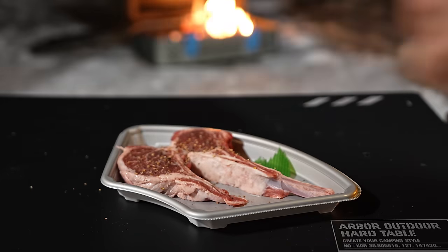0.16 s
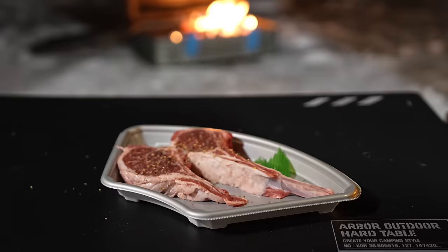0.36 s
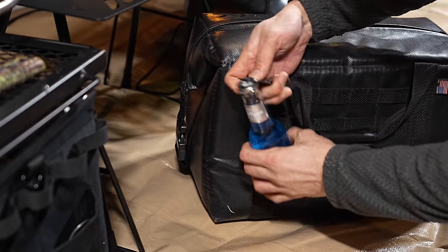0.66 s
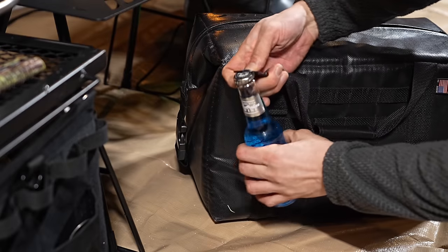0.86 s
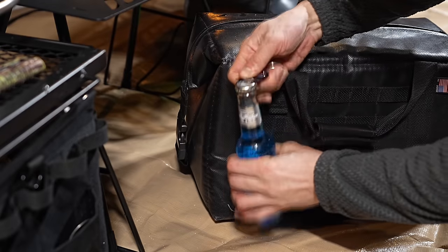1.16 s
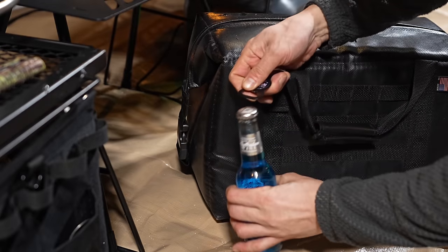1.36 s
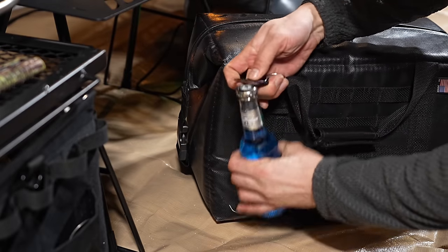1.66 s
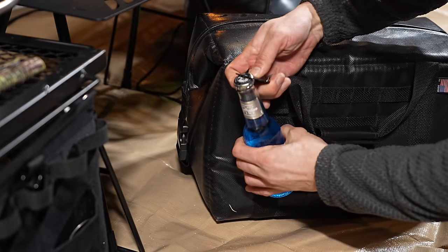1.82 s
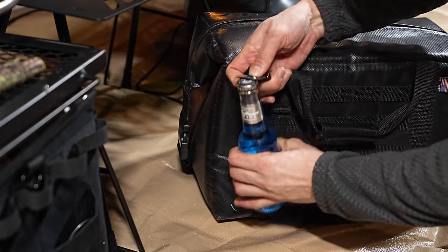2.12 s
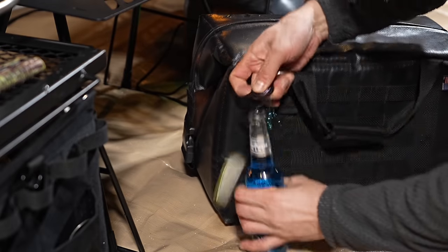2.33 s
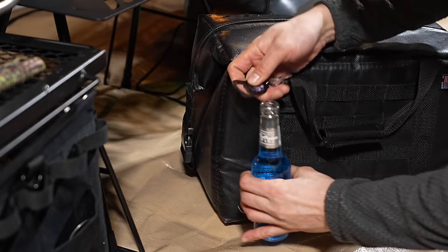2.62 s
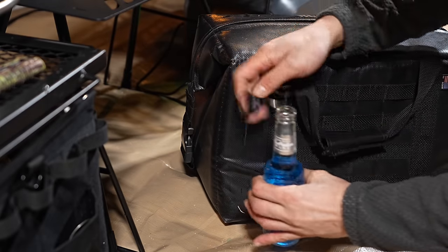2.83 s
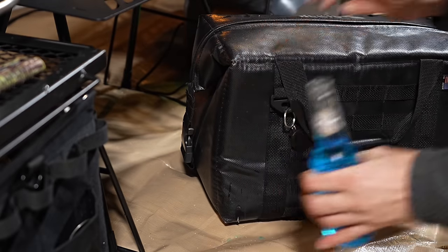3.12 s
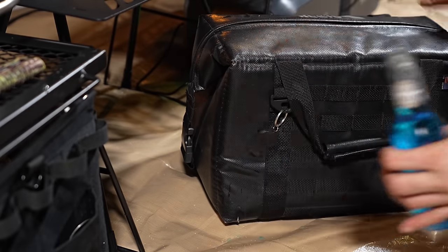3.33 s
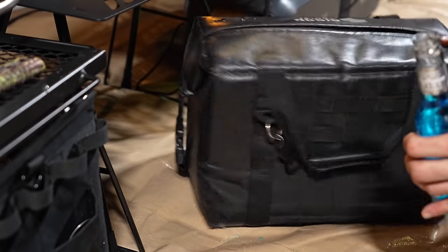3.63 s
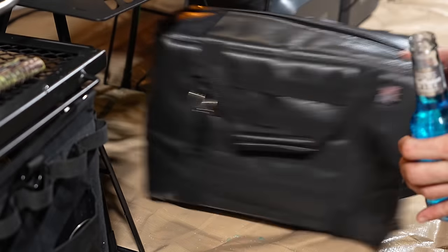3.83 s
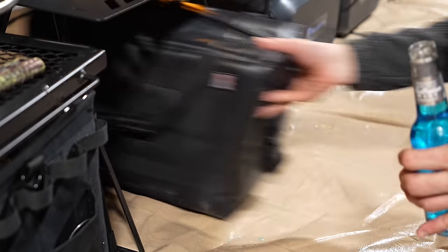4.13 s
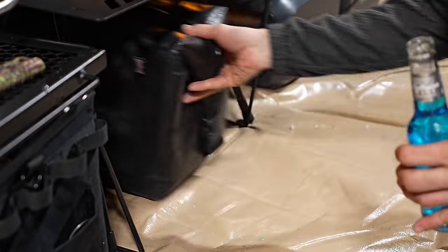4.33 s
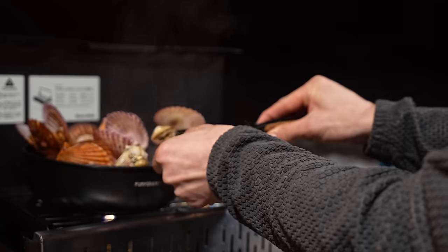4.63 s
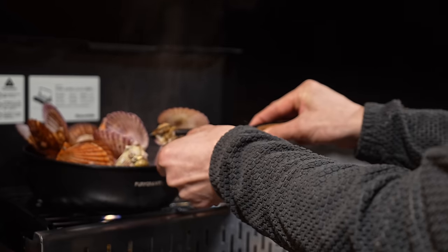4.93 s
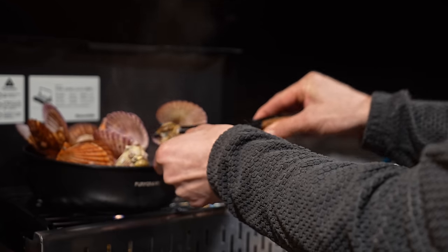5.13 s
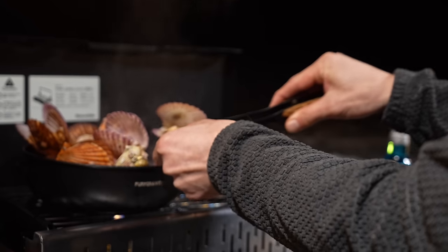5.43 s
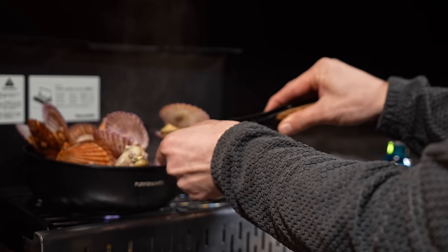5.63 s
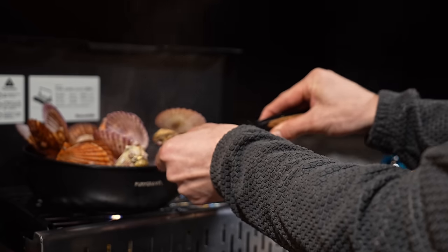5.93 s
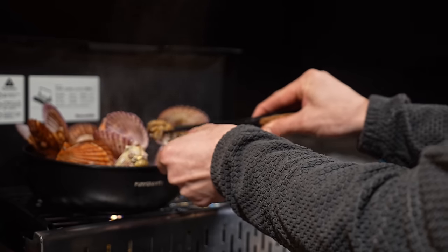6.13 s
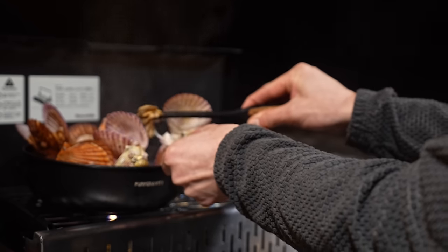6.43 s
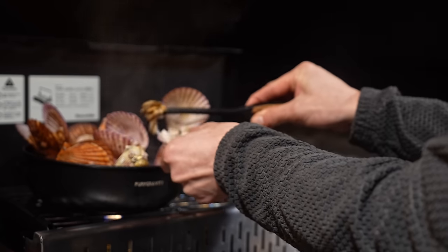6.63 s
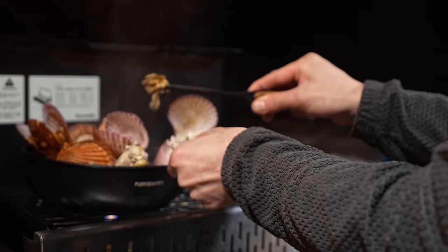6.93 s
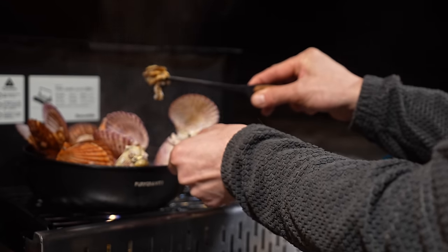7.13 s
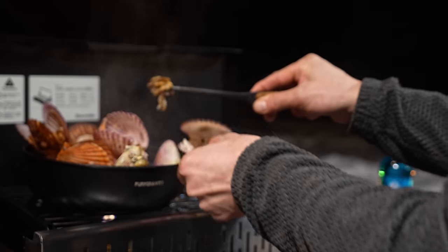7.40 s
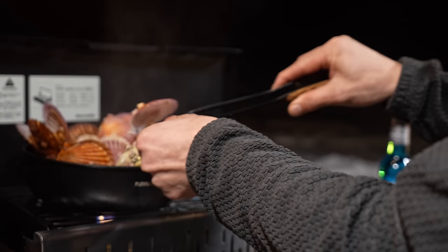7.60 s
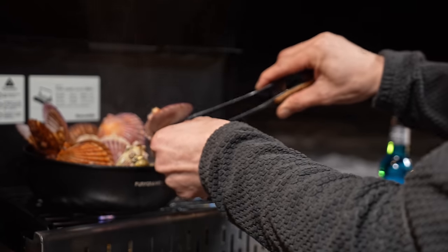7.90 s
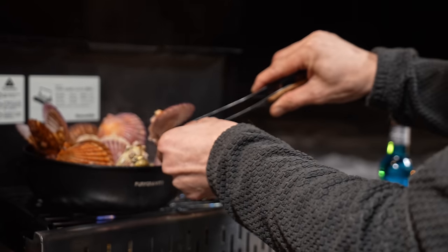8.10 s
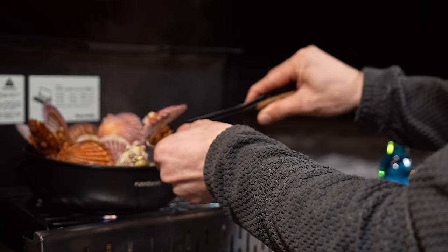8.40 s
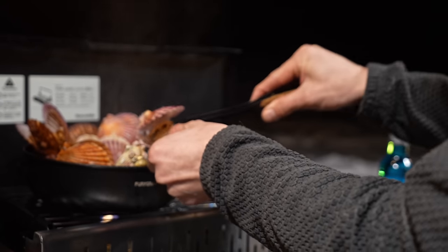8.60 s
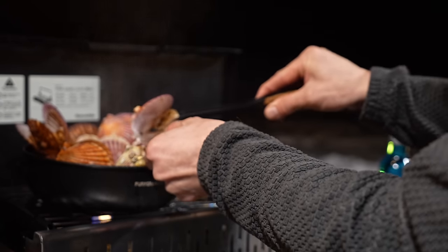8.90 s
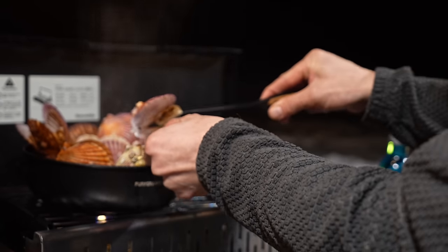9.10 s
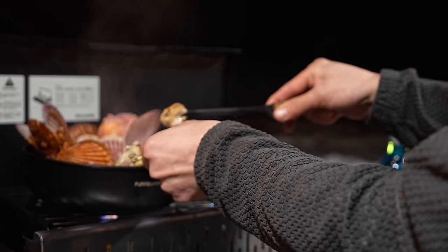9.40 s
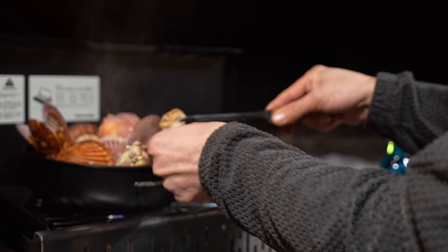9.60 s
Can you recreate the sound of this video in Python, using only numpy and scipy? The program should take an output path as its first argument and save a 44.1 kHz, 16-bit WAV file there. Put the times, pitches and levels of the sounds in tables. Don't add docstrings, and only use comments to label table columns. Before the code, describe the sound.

In a small tent porch with a short, sharp echo, a low flame roars throughout. First a light tray scrapes with a thin, high squeak. Then come metallic opener knocks, fizzing gas, a glassy cap pop and dull bounces, followed by a bottle set down and a heavy bag dragged over tarp. Finally dry, bright clicks of tongs on shells end with a firm pan knock, captured close in mono.

```python
import sys
import numpy as np
from scipy import signal
from scipy.io import wavfile
from scipy.ndimage import uniform_filter1d

SR = 44100
rng = np.random.default_rng(int(sys.argv[2]) if len(sys.argv) > 2 else 0)


def wav_record(signal):
    frames = np.transpose(np.atleast_2d(signal))
    bounded = np.clip(frames, -1, 1)
    quanta = np.round(bounded * 32767).astype(np.int16)
    wavfile.write(sys.argv[1], SR, quanta)


def voltage_ratio(decibels):
    exponent = np.asarray(decibels, float) / 20
    return 10 ** exponent


N = 429971


def rms_one(x):
    return x / np.sqrt(np.mean(x ** 2) + 1e-20)


def in_time(rows, silent=-120):
    s, *columns = np.transpose(rows)
    return [np.interp(np.arange(N) / SR, s, c, silent, silent) for c in columns]


def band(x, low_hz, high_hz):
    sos = signal.butter(2, [low_hz, min(high_hz, .45 * SR)], "band", fs=SR, output="sos")
    return signal.sosfilt(sos, x)


def drift(rate):
    r = np.exp(-80 * np.pi * rate / SR)
    slow = signal.lfilter([1], [1, -2 * r, r * r], rng.standard_normal(N // 40 + 2002))[2000:]
    return np.interp(np.arange(N) / 40, np.arange(len(slow)), rms_one(slow))


def ring(clicks, hz, t60):
    r, w = voltage_ratio(-60 / (t60 * SR)), 2 * np.pi * hz / SR
    return signal.lfilter([0, np.sin(w)], [1, -2 * r * np.cos(w), r * r], clicks + 1e-18)


def damped(hz, t60):
    t = np.arange(round(t60 * SR)) / SR
    return np.sin(2 * np.pi * hz * t) * voltage_ratio(-60 * t / t60)


def add(out, i, sound):
    out[i:i + len(sound)] += sound[:N - i]


def blows(hits, colour_db, own_db, modes=(), ring_db=-10, own_cycles=28, split=0.05, luck_db=1.5, spike=1.3):
    # (low edge [Hz], high edge [Hz], T60 [s])
    crack_bands = [(277, 3800, 0.017), (2580, 8770, 0.0069), (6500, 16300, 0.0083)]
    rows, out = np.array(hits), np.zeros(N)
    at = np.round(rows[:, 0] * SR).astype(int)
    first = at[0]
    size = min(at[-1] + SR // 3, N) - first
    luck = rng.normal(0, luck_db, (len(at), len(modes)))
    for k, (low_hz, high_hz, t60) in enumerate(crack_bands):
        level_db = rows[:, 1] + colour_db[k] + (k - 1) * rows[:, 3]
        clicks = np.zeros(size)
        clicks[at - first] = voltage_ratio(level_db)
        rough = rng.standard_normal(size)
        rough[at - first] = spike
        dying = signal.lfilter([1], [1, -voltage_ratio(-60 / (t60 * SR))], clicks + 1e-18)
        equal_power = np.sqrt(SR / 2 / (high_hz - low_hz))
        out[first:first + size] += band(dying * rough, low_hz, high_hz) * equal_power
        for m, (hz, mode_db, ring_s) in enumerate(modes):
            if low_hz <= hz < high_hz:
                clicks[at - first] = voltage_ratio(level_db + mode_db + ring_db + luck[:, m])
                out[first:first + size] += ring(clicks, hz, ring_s)
    for i, (s, peak_db, hz, *_), detune in zip(at, hits, rng.uniform(-split, split, len(at))):
        t60 = own_cycles / hz
        pair = damped(hz, t60) + 0.5 * damped(hz * (1 + detune), t60)
        add(out, i, voltage_ratio(peak_db + own_db) * pair)
    return out


def strokes(rows, colour_db):
    fade_db = 25
    lean = np.linspace(-1, 1, len(colour_db))
    t = np.arange(0, N, 16) / SR
    out = 0
    for s, db, rise, fall, bright_db in rows:
        shape_db = -fade_db * np.maximum((s - t) / max(rise, .002), (t - s) / max(fall, .002))
        band_gain = voltage_ratio(db + np.array(colour_db) + bright_db * lean)
        out = out + np.outer(band_gain, voltage_ratio(np.maximum(shape_db, -200)))
    return np.repeat(out, 16, axis=1)[:, :N]


def rubbing(gains, edges_hz, per_s, spread_db, modes=(), ring_share=0, patchy_db=4.5, grip_db=4.5, damping=0.14):
    happens = rng.random(N) < per_s / SR
    height = voltage_ratio(spread_db * np.minimum(rng.exponential(1, N), 5))
    slips = rms_one(happens * height * rng.standard_normal(N))
    if modes:
        rings = 0
        for hz, db, t60 in modes:
            grip = voltage_ratio(db / 2 + grip_db * drift(6.9))
            rings = rings + grip * rms_one(ring(slips, hz, damping * t60))
        slips = slips + ring_share * rms_one(rings)
    gains = uniform_filter1d(gains, size=300)
    out = 0
    for k, (low, high) in enumerate(zip(edges_hz, edges_hz[1:])):
        sign = (-1) ** k
        out = out + sign * gains[k] * voltage_ratio(patchy_db * drift(21.0)) * rms_one(band(slips, low, high))
    return out


def burner():
    # (frequency [Hz], level [dB per Hz])
    flame = [(15, -65), (25, -80), (52, -14), (111, -3.5), (463, -20), (591, -16), (887, -16),
             (2220, -20.5), (2910, -19.5), (6740, -27), (11300, -31), (16000, -33.5)]
    # (start [s], rumble level [dB], roar level [dB])
    settings = [
        (0, -52.5, -56),
        (.54, -55, -54.5),
        (4.5, -56.5, -55.5),
        (7.5, -58, -55),
    ]
    start_s, *levels = np.transpose(settings)
    rumble_db, roar_db = np.array(levels)[:, np.searchsorted(start_s[1:] * SR, np.arange(N))]
    white = rng.standard_normal((2, N))
    edges = 25 * 2 ** np.arange(0, 10, .5)
    points, rumble, roar = np.array(flame), 0, 0
    for k, (low, high) in enumerate(zip(edges, edges[1:])):
        level_db = np.interp(np.log(low * high) / 2, np.log(points[:, 0]), points[:, 1])
        noise = band(white[k % 2], low, high)
        if high < 420:
            rumble = rumble + voltage_ratio(level_db + 3.5 * drift(7.9)) * noise
        else:
            roar = roar + voltage_ratio(level_db + 1.3 * drift(3.6)) * noise
    return voltage_ratio(rumble_db) * rms_one(rumble) + voltage_ratio(roar_db) * rms_one(roar)


def tray_slide():
    # (peak time [s], level [dB], rise [s], fall [s], brightness [dB])
    slides = [
        (0.02, -55.5, 0.056, 0.22, -2),
        (0.2, -63.5, .1, .2, 2.5),
        (0.35, -64.5, 0.12, .2, -6),
        (0.466, -52.5, 0.38, 0.29, 1),
    ]
    gains = strokes(slides, (-1.0, -7, -0.5, -1.5))
    return rubbing(gains, [200, 600, 2500, 7000, 16500], per_s=11000, spread_db=0.0, patchy_db=3.5)


def tray_taps():
    # (time [s], peak level [dB], own pitch [Hz], hardness [dB])
    taps = [
        (0.0562, -28.5, 6340, 9),
        (0.1281, -39, 2150, -9),
        (0.172, -35.5, 3500, -14),
        (0.204, -37, 3820, -11),
        (0.2442, -26.5, 9900, 1),
    ]
    return blows(taps, (-19, -19, -19), own_db=-11.0)


def squeak():
    # (time [s], frequency [Hz], level [dB])
    first_line = [(.25, 13100, -65), (.3, 13200, -65), (.34, 14000, -61), (.372, 14900, -59),
                  (.378, 14000, -60), (.41, 14100, -56), (.445, 14900, -53), (.455, 14900, -70)]
    second_line = [(.435, 14400, -66), (.455, 14150, -53), (.49, 14500, -52), (.497, 15000, -55),
                   (.52, 14500, -55), (.528, 14300, -68)]
    # (time [s], level [dB])
    undertone = [(.3, -70), (.36, -57), (.42, -53), (.48, -51), (.52, -54), (.53, -75)]
    waver = 1 + .004 * drift(120)
    out = voltage_ratio(in_time(undertone)[0]) * rms_one(ring(rng.standard_normal(N), 6150, 0.01))
    flicker_db = 3.0 * drift(40)
    for hz, line_db in map(in_time, (first_line, second_line)):
        phase = 2 * np.pi * np.cumsum((hz * waver)[:SR]) / SR
        out[:SR] += voltage_ratio(line_db + flicker_db)[:SR] * np.sin(phase)
    return out


def opener_hits():
    # (time [s], peak level [dB], own pitch [Hz], hardness [dB])
    knocks = [(0.5799, -30, 2190, -10), (0.6571, -11, 3700, -0.5), (0.8594, -54, 12600, 2),
              (1.0805, -35.5, 2330, 13), (1.1493, -29.5, 1920, 3.5), (1.2097, -2, 13200, 7),
              (1.35, -38, 2500, 4), (1.386, -38, 2800, -1), (1.9167, -37.5, 12000, 10.5),
              (1.955, -40.5, 700, -10), (2.1337, -30, 2580, -5), (2.196, -31.5, 3520, -2),
              (2.4115, -24, 4610, 1), (2.7329, -35.5, 12500, 4), (2.7435, -42, 1950, -16),
              (3.1118, -38, 13800, 12), (3.6116, -27, 1260, 13)]
    return band(blows(knocks, (-13, -6, -14), own_db=-8.0, own_cycles=15.0, split=.12), 500, 19000)


def thuds():
    # (time [s], peak level [dB], frequency [Hz], T60 [s])
    pushes = [(0.651, -37, 125, 0.064), (0.813, -32, 87.5, 0.063), (1.212, -29, 113, 0.078),
              (1.762, -34.5, 287, 0.14), (1.784, -31.5, 122, 0.1), (2.081, -37, 196, 0.037),
              (2.249, -19, 151, 0.056), (2.259, -11, 84, 0.047), (2.267, -21.5, 164, .04),
              (2.467, -22, 181, 0.077), (3.037, -6.5, 145, 0.039), (3.137, -27.5, 106, 0.047),
              (3.199, -35.5, 186, 0.027), (3.392, -31, 168, 0.087), (3.426, -30, 133, 0.059),
              (3.463, -22, 68, 0.092), (3.558, -34, 137, 0.085), (3.984, -15.5, 154, 0.05),
              (4.269, -21.5, 155, 0.078), (4.487, -22.5, 188, 0.023), (5.753, -28, 128, 0.0086),
              (9.733, -37, 160, .03)]
    out = np.zeros(N)
    for s, peak_db, hz, t60 in pushes:
        add(out, round(s * SR), -voltage_ratio(peak_db + 2.5) * damped(hz, t60))
    return band(band(out, 71, 700), 59, 1500)


def gas_hiss():
    # (peak time [s], level [dB], rise [s], fall [s], brightness [dB])
    puffs = [
        (0.862, -62, 0.0035, 0.06, 24),
        (0.984, -41.5, 0.15, 0.067, 10),
        (0.986, -46, .07, .05, 2.5),
        (1.225, -32, 0.016, .13, 1),
        (1.36, -68, 0.065, 0.19, -2),
        (1.783, -41, 0.027, 0.016, 0),
        (2.27, -30.5, 0.028, 0.11, -5),
        (2.37, -53, 0.034, 0.16, 2),
    ]
    gains = strokes(puffs, (-3.5, -2.0, -1.0, -1.5))
    return rubbing(gains, [2000, 4700, 7200, 10500, 16500], per_s=53000, spread_db=0.5, patchy_db=3.0)


def opener_pings():
    # (time [s], peak level [dB], own pitch [Hz], hardness [dB])
    pings = [
        (1.6317, -18.5, 4620, 7.5),
        (1.7145, -26, 4600, 0.5),
        (2.3444, -14, 4620, 0.5),
    ]
    # (frequency [Hz], level [dB], T60 [s])
    steel = [(2940, -5, 0.091), (6800, -19, 0.086), (8170, -16, .07), (9600, 2, 0.027), (11580, -8, .025)]
    return blows(pings, (-14, -19, -14), own_db=-14.5, modes=steel, ring_db=-10.0, own_cycles=170, split=0.025)


def cap_bite():
    # (time [s], peak level [dB], own pitch [Hz], hardness [dB])
    bite = [
        (1.7842, -1.7, 3220, 4),
    ]
    # (frequency [Hz], level [dB], T60 [s])
    tin = [(1520, 7, 0.016), (4480, -2, 0.011), (6620, -27, .05)]
    return blows(bite, (-13.5, -14.5, -14), own_db=-1.5, modes=tin, ring_db=1, own_cycles=14, split=.2, spike=.6)


def cap_lift():
    # (time [s], peak level [dB], own pitch [Hz], hardness [dB])
    snaps = [
        (2.2474, -9, 1080, 1.2),
        (2.2552, -3.5, 1100, 5.8),
        (2.2687, -3.5, 1120, 8.6),
        (2.283, -3, 3330, 10),
    ]
    # (frequency [Hz], level [dB], T60 [s])
    glass = [(3955, -4, .2), (4655, -4, .26), (3912, -8, .12), (7090, -14, .1), (7560, -11, .12),
             (8590, -14, .12), (10110, -9, .08), (12300, -10, .05), (13400, -12, .07)]
    return blows(snaps, (-17, -11, -15), own_db=-22.0, modes=glass, ring_db=-10.5, own_cycles=31)


def cap_bounces():
    # (time [s], peak level [dB], own pitch [Hz], hardness [dB])
    bounces = [
        (2.465, -5, 1270, -3.5),
        (2.469, -1.5, 850, -7),
        (2.517, -42, 900, -4),
        (2.526, -34, 869, 1),
        (2.538, -33, 630, -17),
        (2.564, -21.5, 950, -3),
        (2.654, -30, 1060, -5),
        (2.683, -41, 1310, 1),
    ]
    # (frequency [Hz], level [dB], T60 [s])
    wood = [(378, -2.5, .05), (605, 8, 0.049), (860, 6, 0.045), (1080, 4, 0.047), (1234, 0, 0.033),
            (1380, -8, .03), (2400, -11, .03)]
    return blows(bounces, (-21, -22, -21), own_db=-5.5, modes=wood, ring_db=-5.5, own_cycles=16.0)


def bag_drag():
    # (time [s], level [dB])
    force = [
        (2.85, -53.5),
        (3.17, -46.5),
        (3.43, -48.5),
        (3.54, -40.5),
        (3.75, -33.5),
        (3.98, -24),
        (4.25, -29),
        (4.43, -37.5),
        (4.49, -47.5),
    ]
    # (frequency [Hz], level [dB], T60 [s])
    cloth = [(1290, 11, 0.028), (3530, -11, 0.0022)]
    colour_db, follows = (-11, -11, -6.5, -5.5, -3.0), (0.95, 1.32, 1.13, 1.114, 1.23)
    force_db, = in_time(force)
    top_db = np.max(force_db)
    gains = np.array([voltage_ratio(top_db + db + share * (force_db - top_db)) for db, share in zip(colour_db, follows)])
    return rubbing(gains, [70, 400, 1250, 2500, 7000, 16500], per_s=16000, spread_db=2.4,
                   modes=cloth, ring_share=.3, patchy_db=1.1, grip_db=1.5)


def bottle_down():
    # (time [s], peak level [dB], own pitch [Hz], hardness [dB])
    landings = [
        (3.037, -4.5, 350, -2.5),
        (3.396, -24, 382, -2),
        (4.487, -27, 298, -2),
    ]
    # (frequency [Hz], level [dB], T60 [s])
    soil = [(630, 5, 0.019), (874, -14, 0.053), (1080, -4, 0.055)]
    return blows(landings, (-28, -25, -28), own_db=-6, modes=soil, ring_db=10.0, own_cycles=4.1)


def tarp_cracks():
    # (time [s], peak level [dB], own pitch [Hz], hardness [dB])
    folds = [
        (3.5857, -32, 13100, 12),
        (3.649, -20, 3000, 9),
        (3.739, -24, 1200, 0),
        (3.906, -33, 7000, 1),
        (3.983, -14, 11500, 14),
        (4.006, -17, 10000, 8),
        (4.064, -17, 7000, 8),
        (4.098, -15, 10500, 5),
        (4.4518, -30, 3420, 4),
        (4.46, -30, 900, -6),
    ]
    return blows(folds, (-16, -12, -13), own_db=-6, own_cycles=13)


def shell_rings(mode_db, cycles):
    # (time [s], peak level [dB], low mode [Hz], middle mode [Hz], high mode [Hz])
    firm_clicks = [(5.435, -19.5, 1890, 4380, 6270), (5.5044, -20.5, 1870, 4350, 6300),
                   (5.5443, -15.5, 1910, 4380, 5360), (5.5892, -16, 2020, 3690, 5600),
                   (6.1838, -22.5, 1390, 3450, 6300), (6.8079, -22.5, 1400, 4900, 6940),
                   (7.6889, -24, 1896, 4900, 7360), (7.87, -16.5, 2130, 4830, 6200),
                   (7.9019, -19.5, 2020, 4870, 6200), (7.9204, -21, 2000, 3720, 6300),
                   (8.0257, -15.5, 2400, 4580, 5850), (8.0934, -29, 2370, 4360, 6230),
                   (8.1324, -26, 2130, 4900, 6460), (8.739, -16, 2130, 3900, 6700),
                   (8.8184, -17.5, 1920, 3750, 6270)]
    out = np.zeros(N)
    for s, peak_db, *modes in firm_clicks:
        for hz, db, turns in zip(modes, mode_db, cycles):
            add(out, round(s * SR), voltage_ratio(peak_db + db) * damped(hz, turns / hz))
    return out


def shell_hits():
    # (time [s], peak level [dB], own pitch [Hz], hardness [dB])
    tong_clicks = [(4.5206, -26, 2720, 5.5), (4.6536, -31, 3430, 8), (4.789, -38, 13500, 9),
                   (4.8834, -32.5, 12500, 11), (5.0409, -33, 2190, 7), (5.0732, -32, 12100, 15),
                   (5.1223, -23, 2940, -5), (5.2297, -14.5, 8800, 9.5), (5.3587, -23.5, 12500, -1),
                   (5.435, -12, 4400, 10.5), (5.5045, -13, 4700, 6), (5.5445, -9, 4700, 8),
                   (5.5902, -12, 3900, 3.5), (5.6986, -21, 6000, 6), (5.7628, -29, 13100, 13),
                   (5.8672, -36, 8150, 18), (6.1843, -15.5, 6540, 2), (6.2178, -30, 6300, 6),
                   (6.347, -33, 6440, 21), (6.4041, -29.5, 2660, 3), (6.4779, -22, 8600, 12),
                   (6.7745, -27, 1330, -5), (6.8079, -13.5, 8700, 6), (6.8885, -18.5, 6870, 1),
                   (6.9498, -23, 6300, 9), (7.074, -38, 12500, 11),
                   (7.406, -29.5, 2500, 14), (7.6892, -19.5, 1860, -6), (7.871, -14, 6500, 14.5),
                    (7.903, -14.5, 8250, 14.5), (7.9212, -14.5, 6240, 13), (8.026, -11, 8000, 11),
                    (8.0947, -25, 6180, 11), (8.1325, -20, 6000, 10), (8.43, -32, 4540, 1),
                    (8.4835, -40, 1370, 12), (8.6933, -23, 10400, 2), (8.739, -13, 8300, 17),
                    (8.818, -6, 8170, 1.5), (8.94, -28.5, 7700, 4)]
    # (frequency [Hz], level [dB], T60 [s])
    shell = [(1330, -6, .03), (1920, 4, 0.098), (2900, -11, .04), (3700, -9, 0.046), (4400, -8, 0.077),
             (4900, -14, .04), (6300, -9, .05), (8140, -0.5, 0.037), (10340, -7, .04), (12500, -5, .036),
             (14700, -8, .05)]
    out = blows(tong_clicks, (-22, -16, -21), own_db=-16.5, modes=shell, ring_db=-21.0, luck_db=0.5)
    out += shell_rings(mode_db=(-18, -11, -15), cycles=(28.0, 75.0, 45.0))
    later = out[round(7.3 * SR):]
    later -= .6 * band(later, 2450, 3400)
    return band(out, 820, 23000)


def shell_scrape():
    # (peak time [s], level [dB], rise [s], fall [s], brightness [dB])
    scrapes = [(4.79, -65.5, 0.015, 0.23, 16.5), (5.03, -57, .03, 0.44, -3.5),
               (5.14, -45.5, 0.075, 0.24, 0.5), (5.23, -50, 0.023, 0.48, 8.5), (5.43, -65, 0.022, .05, -9),
               (5.96, -50.5, 0.088, 0.31, 0), (6.2, -49, 0.024, 0.33, 2), (6.36, -65, .04, 0.098, 12),
               (6.49, -56, 0.064, 0.25, 8), (6.83, -41.5, 0.061, 0.16, 6), (6.95, -53, 0.12, 0.027, 0),
               (7.41, -52.5, 0.016, 0.053, -7.5), (7.7, -47.5, 0.018, 0.09, -2),
               (7.77, -43, 0.017, 0.048, 11.5), (7.88, -44, 0.045, 0.088, 11.5),
               (8.04, -54, 0.044, 0.035, 13), (8.095, -59, .02, 0.065, 5), (8.2, -61, 0.11, 0.12, 8),
               (8.696, -62, 0.17, 0.11, -7), (9.25, -64, 1, 1, -3.5), (9.468, -45, 0.035, 0.014, -1)]
    # (frequency [Hz], level [dB], T60 [s])
    rubbed_shell = [(1950, -2, 0.078), (2980, 0, 0.053), (3700, 0, .06), (4750, -1, .05), (6380, 2, .035),
                    (8000, -3, .02), (10400, -7, .015), (12500, -7, .015)]
    return rubbing(strokes(scrapes, (-2, -4, 0)), [900, 2500, 7000, 16500], per_s=9000, spread_db=1.7,
                   modes=rubbed_shell, ring_share=.7, patchy_db=1.8, grip_db=4.0, damping=.26)


def pan_knock():
    # (time [s], peak level [dB], own pitch [Hz], hardness [dB])
    knock = [
        (9.471, 0, 1290, 1.2),
    ]
    # (frequency [Hz], level [dB], T60 [s])
    plate = [(1500, -10, .03), (1930, -9, .04), (2150, -4, 0.024), (2670, -5.5, .03)]
    out = blows(knock, (-16, -18, -17), own_db=-14, modes=plate, ring_db=-4.5, own_cycles=22, spike=0.44)
    return band(out, 800, 19000)


def pan_nudge():
    # (time [s], peak level [dB], own pitch [Hz], hardness [dB])
    nudges = [
        (9.5795, -24, 1460, -9),
        (9.592, -30, 1240, -12),
    ]
    return band(blows(nudges, (-24, -30, -30), own_db=-5, own_cycles=23, spike=.3), 850, 2600)


def tent(x, echo_db, tail_db):
    # (frequency [Hz], T60 [s])
    decay = [(300, 0.11), (1200, 0.062), (3800, 0.18), (10500, 0.23)]
    t = np.arange(round(.4 * SR)) / SR
    tail = 0
    for hz, t60 in decay:
        tail = tail + band(rng.standard_normal(len(t)), hz / 2.1, hz * 1.79) * voltage_ratio(-60 * t / t60)
    response = voltage_ratio(tail_db) * tail * np.clip(t / 0.004, 0, 1) / np.sqrt(np.sum(tail ** 2))
    response[0] = 1
    response[round(.0077 * SR)] += voltage_ratio(echo_db)
    response[round(.0084 * SR)] += voltage_ratio(echo_db - 13)
    return signal.fftconvolve(x, response)[:N]


def scene():
    near = tray_taps() + opener_hits() + opener_pings() + cap_bite() + cap_lift() + cap_bounces()
    near += bottle_down() + tarp_cracks() + pan_nudge()
    struck = tent(near, echo_db=-15, tail_db=-1.0) + thuds()
    struck += tent(shell_hits(), echo_db=1.5, tail_db=1.0)
    struck += tent(pan_knock(), echo_db=-3.5, tail_db=-2.0)
    rubbed = tray_slide() + squeak() + bag_drag() + shell_scrape()
    heard = struck + rubbed + gas_hiss() + burner()
    return np.array([heard, heard])


def roll_off(x):
    return signal.sosfilt(signal.butter(12, 16970, fs=SR, output="sos"), x)


def record(dry):
    rounded = np.tanh(band(dry, 32, 20000))
    low_pass = signal.cheby2(16, 32, 15800 * 1.015, fs=SR, output="sos")
    mix = signal.sosfilt(low_pass, rounded)
    return roll_off(mix)


dry = scene()
out = record(dry)
wav_record(out)
```